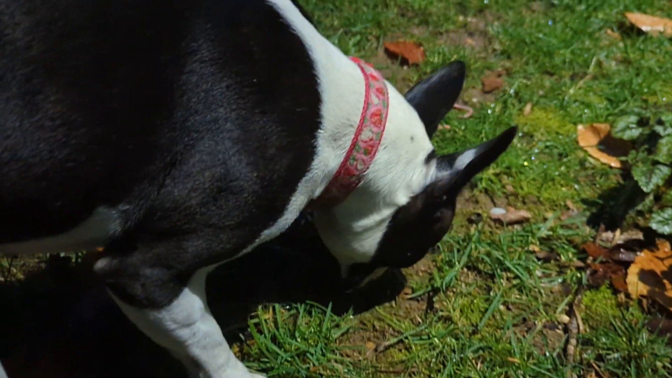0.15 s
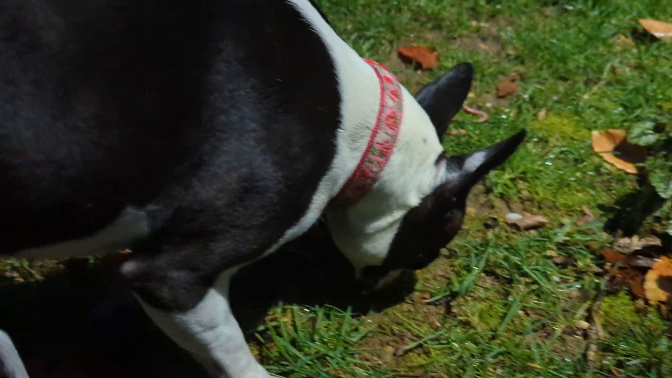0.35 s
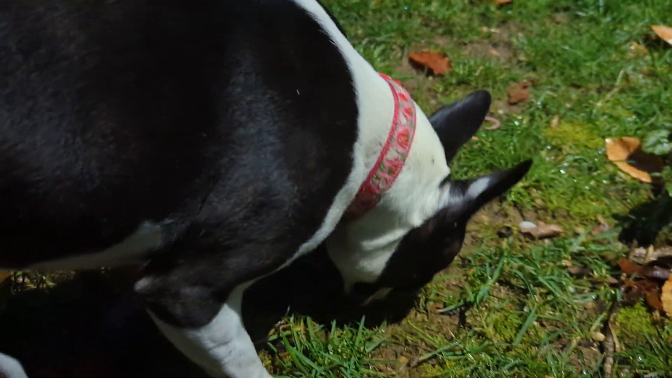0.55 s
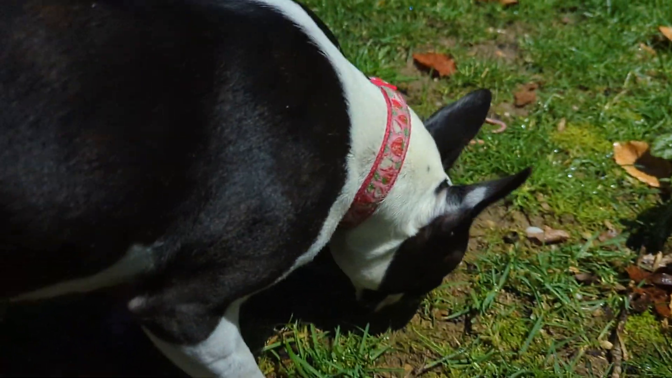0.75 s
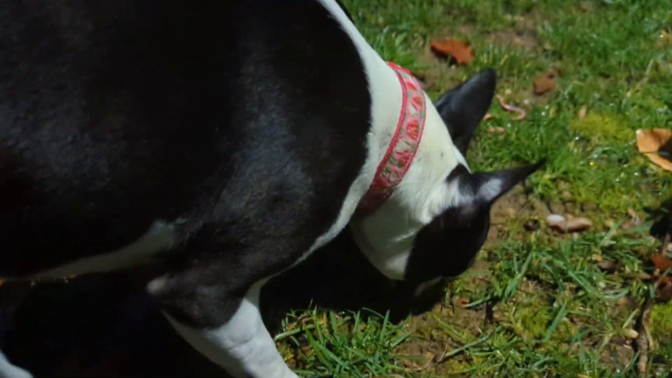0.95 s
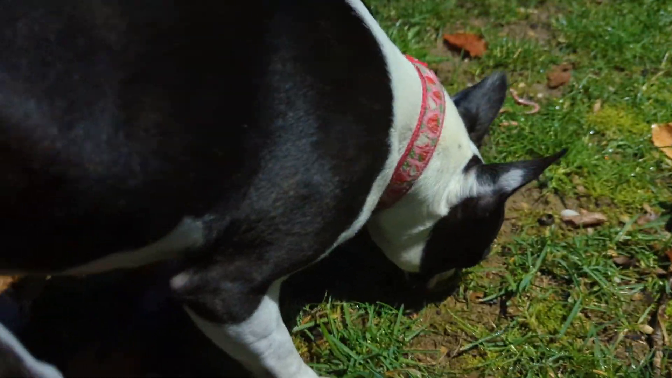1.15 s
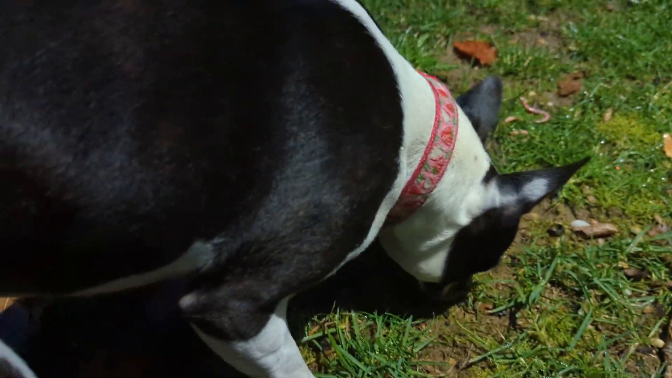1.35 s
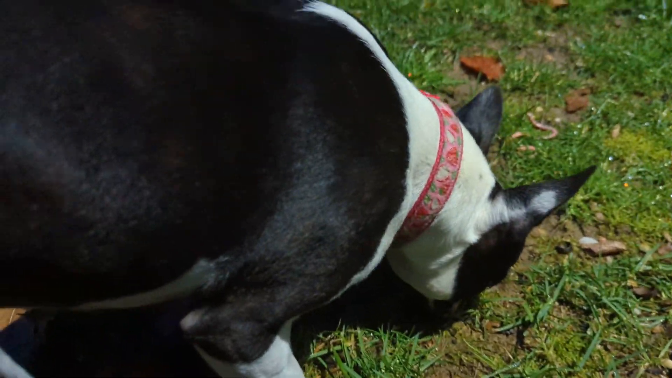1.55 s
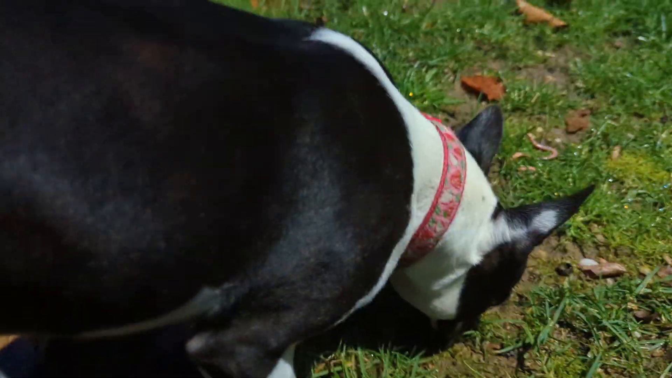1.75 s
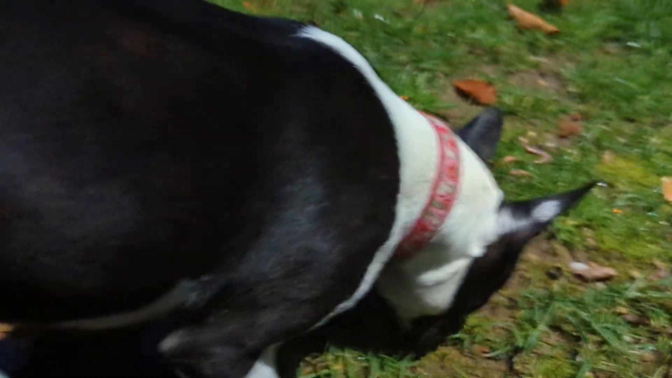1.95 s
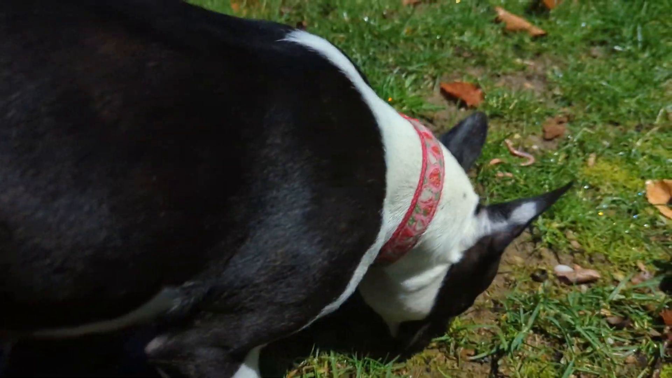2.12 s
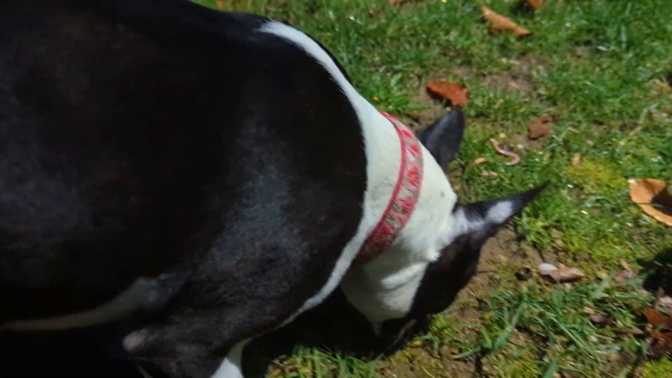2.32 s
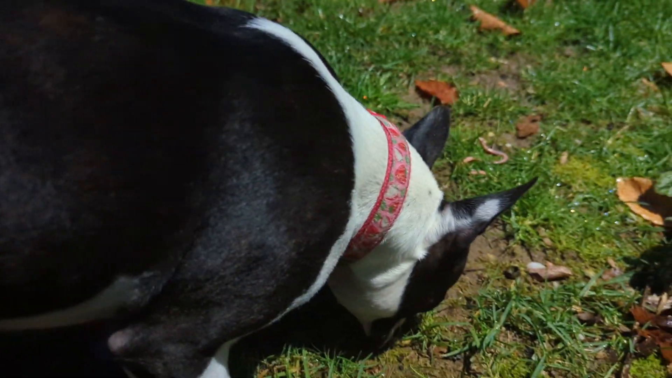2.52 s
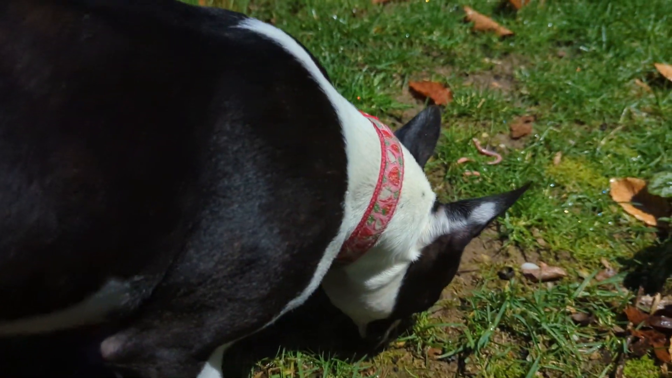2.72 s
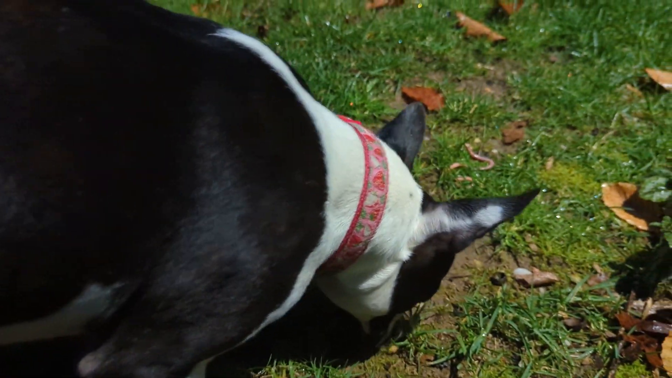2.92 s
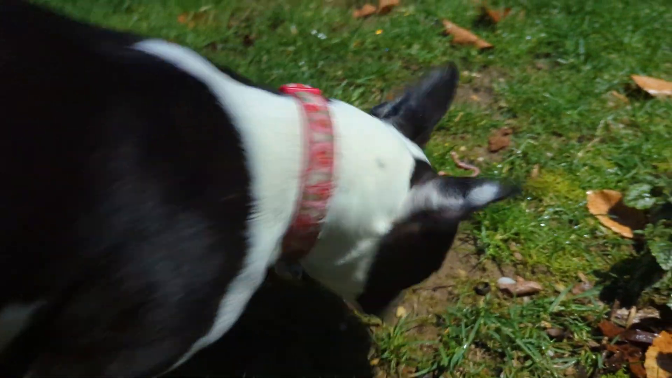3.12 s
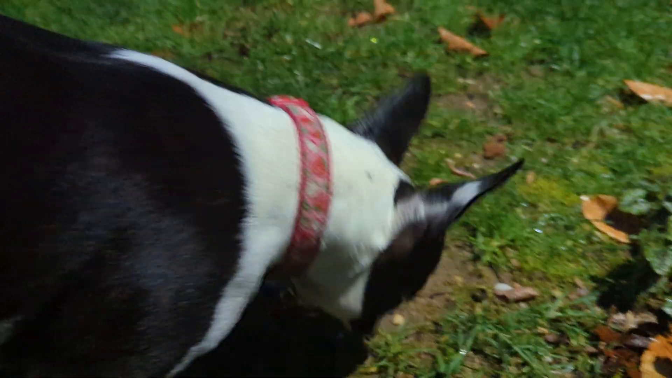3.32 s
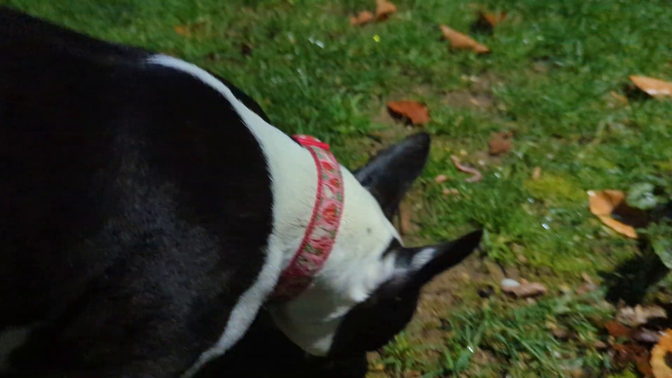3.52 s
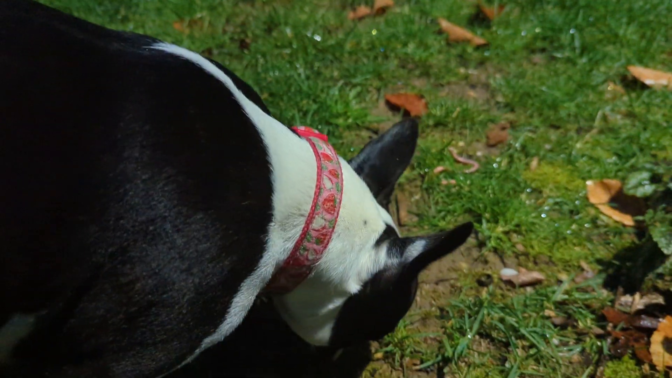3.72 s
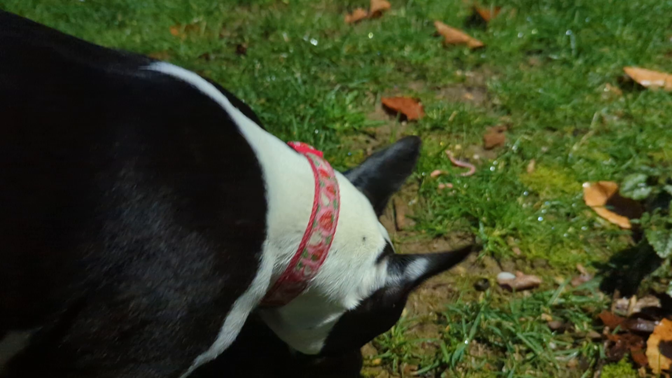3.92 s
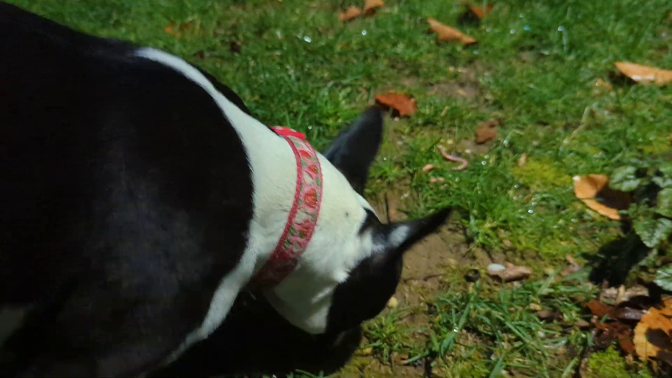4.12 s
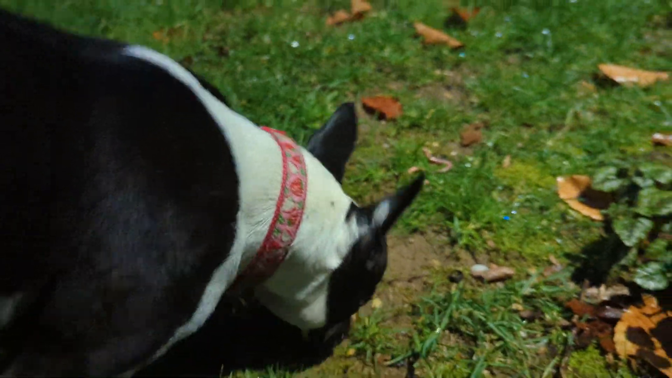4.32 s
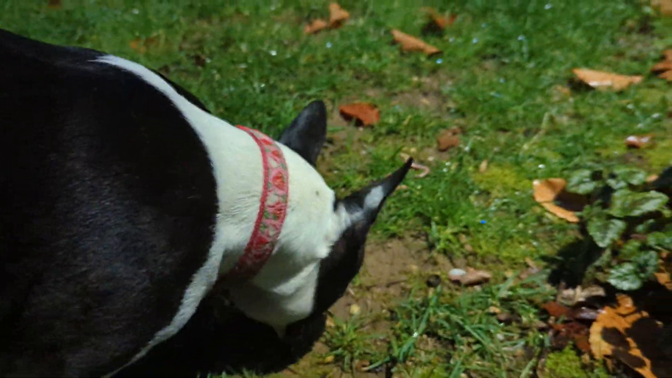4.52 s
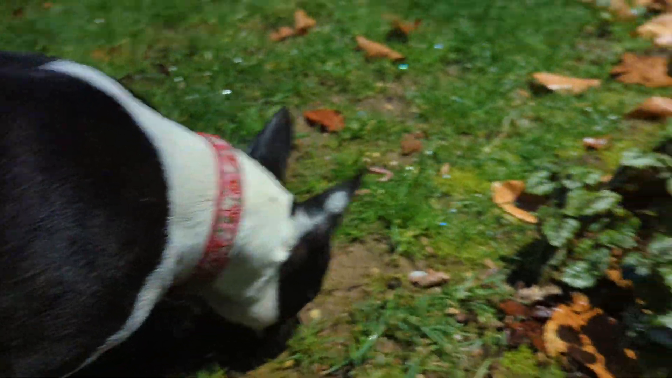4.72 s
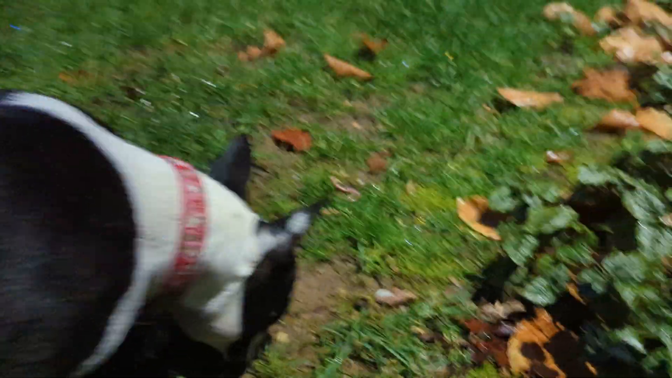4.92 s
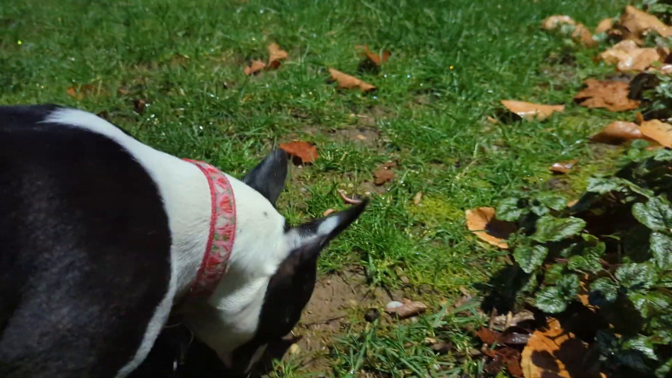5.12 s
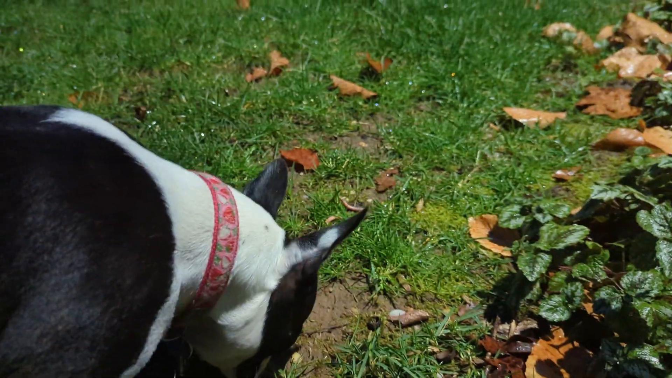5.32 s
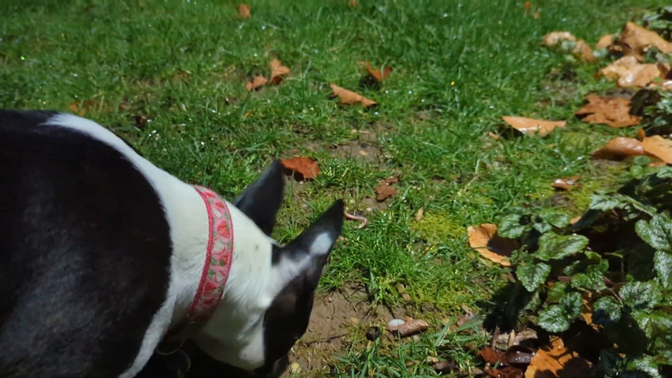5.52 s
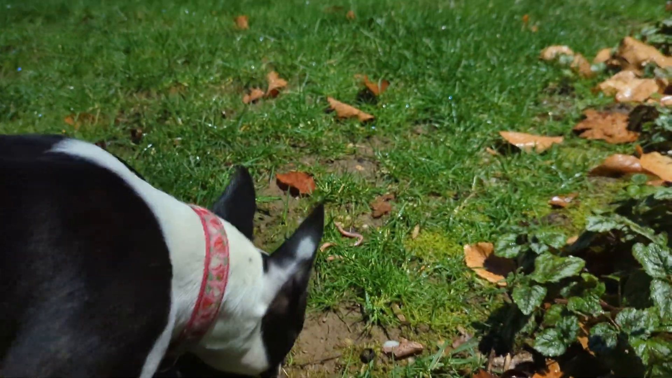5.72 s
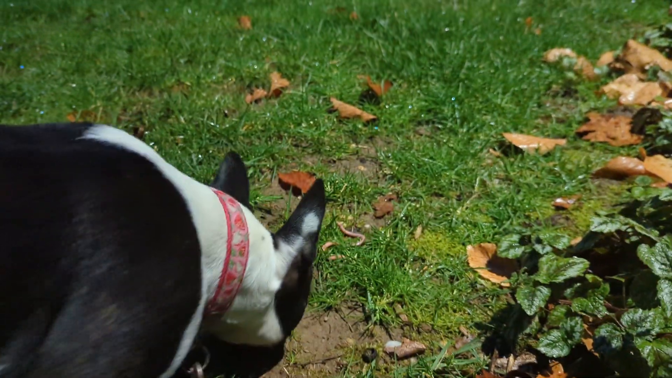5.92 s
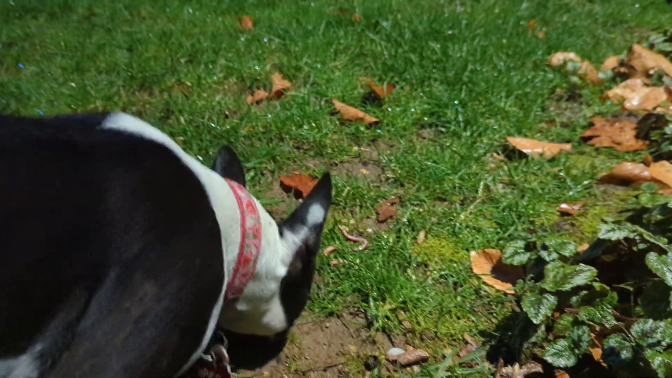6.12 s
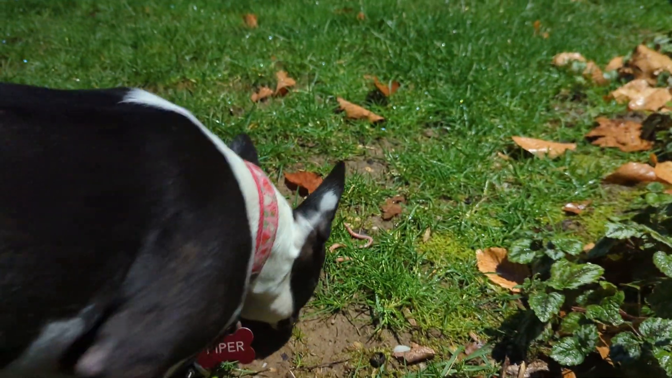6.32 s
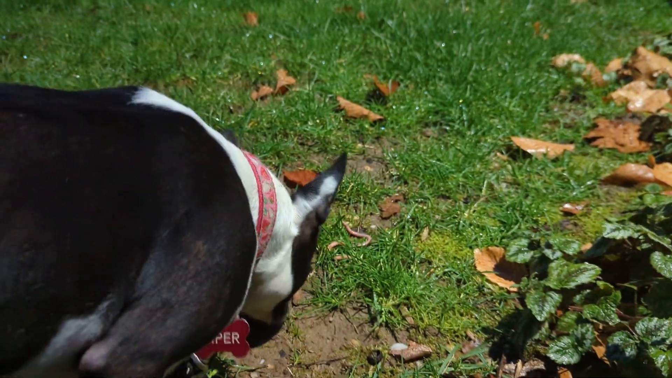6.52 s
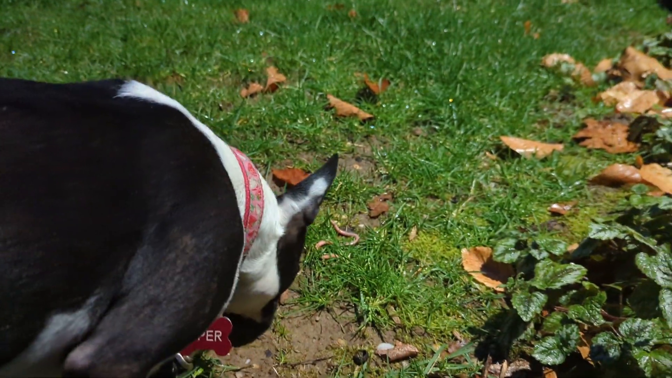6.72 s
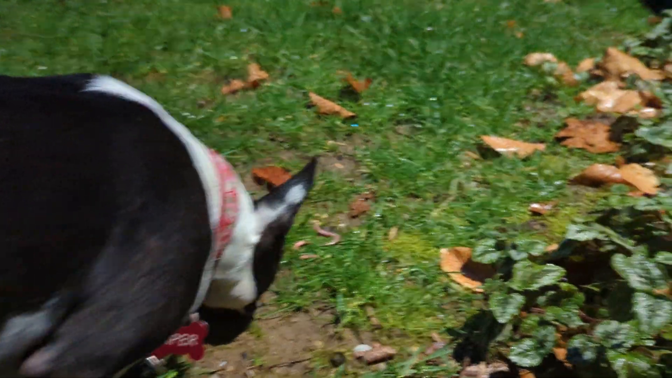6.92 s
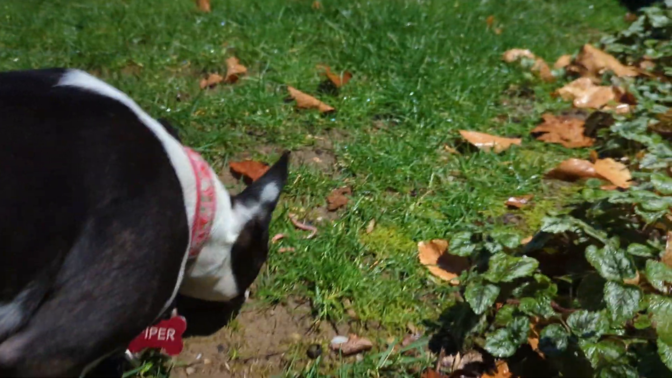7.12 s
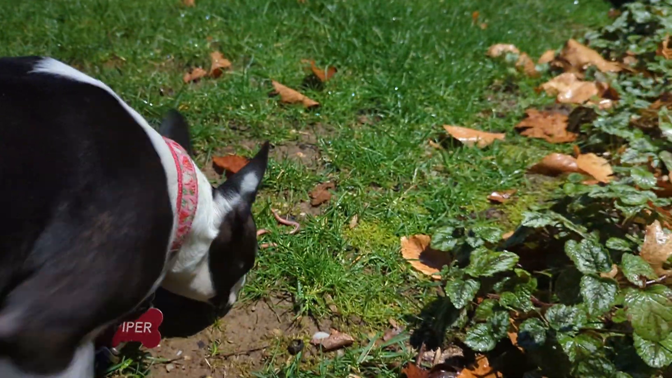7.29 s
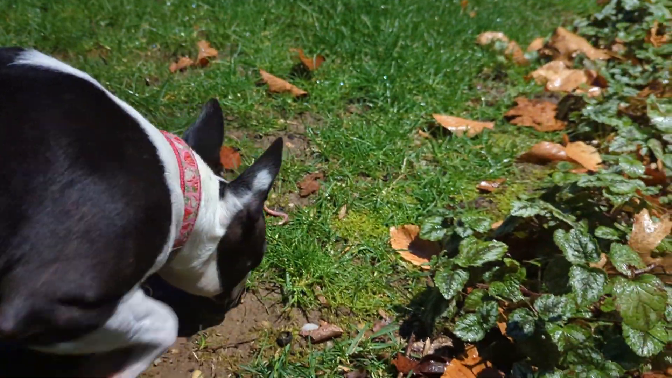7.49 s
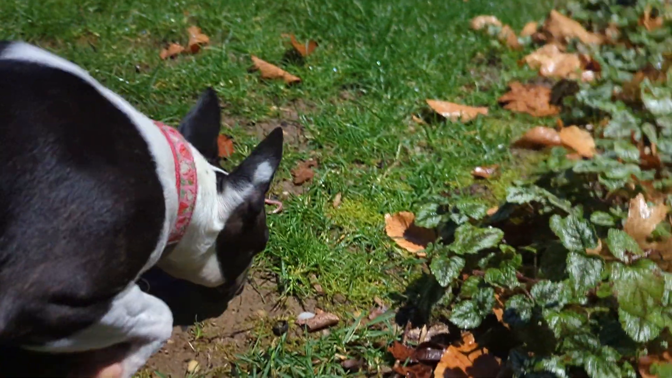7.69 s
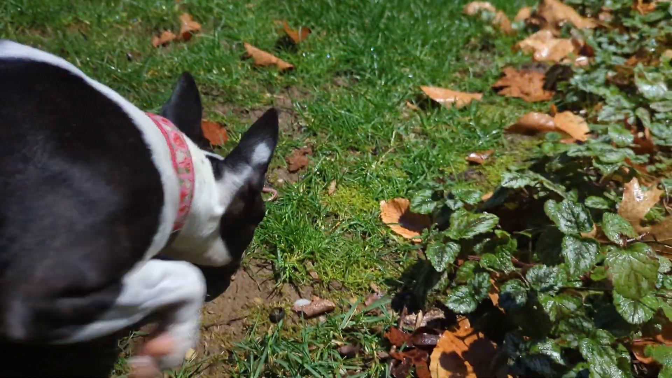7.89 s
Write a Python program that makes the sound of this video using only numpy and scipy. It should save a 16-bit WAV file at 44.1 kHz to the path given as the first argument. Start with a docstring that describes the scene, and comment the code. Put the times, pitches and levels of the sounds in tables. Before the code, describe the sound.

A dog sniffs through grass as its metal collar tags clink, with one bright jingle, over faint distant traffic.

```python
"""A lawn, with a dog nosing through the grass close by. Far traffic rumbles and hisses, low hums
swell and fade, and an engine builds as it pulls away. Grass rustles and snaps under muzzle and paws.
The dog sniffs and snorts: turbulent air through the resonances of nose, nostrils and chest.
The metal tags on its collar scrape together and ring, loudest in one jingle after three seconds."""
import sys
import numpy as np
from scipy import signal
from scipy.fft import rfft, irfft, next_fast_len
from scipy.io import wavfile
from scipy.ndimage import uniform_filter1d

SR = 44100
rng = np.random.default_rng(int(sys.argv[2]) if len(sys.argv) > 2 else 0)


def digitize_waveform(pressure):
    """Quantize a signal to 16-bit integers and store it at the path in sys.argv[1].

    Rows of a 2-D input are taken as channels; values are limited to [-1, 1].
    """
    field = np.atleast_2d(pressure).T
    bounded = np.clip(field, -1, 1)
    quanta = np.round(bounded * 32767).astype(np.int16)
    wavfile.write(sys.argv[1], SR, quanta)


N = 350587


def gain_of(db):
    return 10 ** (np.asarray(db) / 20)


def unit_rms(x):
    return x / np.sqrt(np.mean(x ** 2) + 1e-20)


def curve_at(points, hz):
    """Read a breakpoint curve along a log frequency axis."""
    point_hz, value = np.transpose(points)
    return np.interp(np.log(hz + 1), np.log(point_hz + 1), value)


def add(mix, start_s, sound, pan_db=0):
    """Lay a sound into the stereo mix; positive pan is left."""
    part = mix[:, round(start_s * SR):][:, :sound.shape[-1]]
    part += sound[..., :part.shape[1]] * gain_of([[pan_db / 2], [-pan_db / 2]])


def resonances(x, bands):
    """Parallel band-passes, each given as centre_hz, width_hz, gain_db."""
    return sum(gain_of(db) * signal.lfilter(*signal.iirpeak(hz, hz / width, SR), x)
               for hz, width, db in bands)


def gliding_resonance(x, hz, width_hz):
    """A moving band-pass: shift the curve hz down to zero, smooth, and shift back."""
    carrier = np.exp(2j * np.pi * np.cumsum(hz) / SR)
    pole = np.exp(-np.pi * width_hz / SR)
    return (carrier * signal.lfilter([1 - pole], [1, -pole], x / carrier)).real


def waver(size, depth_db=2.5, smooth_s=0.201):
    """A gain that wanders slowly."""
    width = round(smooth_s * SR) + 1
    drift = uniform_filter1d(uniform_filter1d(rng.standard_normal(size), width), width)
    return gain_of(depth_db * unit_rms(drift))


def noise_bed(spectrum, fft_size, patchy_db, flicker_db):
    """Stereo noise with drifting spectral patches and a flicker shared by all frequencies."""
    # Centred lows, wide highs: freq_hz, left_right_correlation
    stereo_likeness = [(60, 0.986), (180, 0.88), (550, 0.32), (1650, -0.1), (4970, 0.037), (15000, 0.18)]
    hop = fft_size // 2
    frames, hz = N // hop + 5, np.fft.rfftfreq(fft_size, 1 / SR)
    a, b, c, d, patches = rng.standard_normal((frames, len(hz), 5), dtype=np.float32).T
    patches = unit_rms(uniform_filter1d(uniform_filter1d(patches, size=12, axis=0), size=5, axis=1))
    flicker = unit_rms(uniform_filter1d(rng.standard_normal(frames), size=2))
    likeness = curve_at(stereo_likeness, hz)[:, None]
    left = a + 1j * b
    right = likeness * left + np.sqrt(1 - likeness ** 2) * (c + 1j * d)
    colour = gain_of(curve_at(spectrum, hz)[:, None] + patchy_db * patches + flicker_db * flicker)
    _, bed = signal.istft(np.array([left, right]) * colour, window="cosine", nperseg=fft_size, noverlap=hop)
    return unit_rms(bed[:, :N])


def ambience():
    """Far traffic rumble, road hiss and the fine rustle of grass and collar."""
    # Fader moves of the three beds: time_s, rumble_db, hiss_db, rustle_db
    faders = [(0.0, -56.5, -63.5, -73), (0.68, -56.5, -62, -73.5), (1.24, -58, -66.5, -79),
              (1.77, -58.5, -62.5, -77.5), (1.95, -57, -60.5, -64), (2.19, -58.5, -61.5, -74),
              (2.61, -56, -64.5, -77.5), (2.97, -55, -63, -78.5), (3.25, -54, -60, -55.5),
              (3.67, -56, -61.5, -73.5), (4.25, -52.5, -60.5, -71.5), (5.56, -53, -62, -72.5),
              (6.26, -51.5, -61, -71), (6.58, -53.5, -60.5, -66), (7.0, -50.5, -61, -74),
              (7.95, -50, -58.5, -76)]
    # Tone colour of each bed: freq_hz, density_db
    rumble_spectrum = [(25, -37.5), (40, -30.5), (55, -1.5), (70, -4.5), (113, 0), (148, -5.5), (200, -13),
                       (260, -18.5), (350, -21.5), (500, -49.5)]
    hiss_spectrum = [(150, -24), (250, -9), (400, -4), (600, -8), (800, -5), (1300, -5.5), (2200, -5.5),
                     (3200, -12.5), (5000, -21.5), (9000, -35), (16000, -46)]
    rustle_spectrum = [(2500, -23.5), (4500, -6), (5300, -9), (6100, -3), (6500, -4), (7000, -3.5),
                       (8000, -12.5), (10500, -7.5), (11800, -3.5), (13200, -13), (15000, -12.5),
                       (16000, -16.5)]
    beds = [noise_bed(rumble_spectrum, fft_size=4096, patchy_db=2.5, flicker_db=-0.48),
            noise_bed(hiss_spectrum, fft_size=1024, patchy_db=1.5, flicker_db=0.99),
            noise_bed(rustle_spectrum, fft_size=512, patchy_db=2.0, flicker_db=2.5)]
    time_s, *levels_db = np.transpose(faders)
    t = np.arange(N) / SR
    return sum(bed * gain_of(np.interp(t, time_s, db)) for bed, db in zip(beds, levels_db))


def engine(fade_in_s=0.183):
    """An engine pulling away: four harmonics of its firing rate, each wavering in level."""
    # Revs and loudness: time_s, firing_hz, level_db
    revs = [(5.6, 30.8, -51), (6.02, 30.75, -58.5), (6.4, 33.2, -57), (7.03, 34.25, -56.5),
            (7.95, 34.12, -51)]
    # Harmonics 2, 3, 4 and 6: gain_db
    harmonics_db = [-0.5, -5.5, 2, -13]
    time_s, firing_hz, level_db = np.transpose(revs)
    t = np.arange(time_s[0], time_s[-1], 1 / SR)
    cycles = np.cumsum(np.interp(t, time_s, firing_hz)) / SR
    tone = sum(gain_of(db) * waver(len(t)) * np.sin(2 * np.pi * (k * cycles + rng.random()))
               for k, db in zip((2, 3, 4, 6), harmonics_db))
    envelope = gain_of(np.interp(t, time_s, level_db)) * np.minimum((t - t[0]) / fade_in_s, 1)
    out = np.zeros((2, N))
    add(out, t[0], np.sqrt(2) * tone * envelope)
    return out


def hums(fade_s=0.1218):
    """Low sine tones in the centre that swell, glide a little and fade."""
    # One hum a row: start_s, length_s, from_hz, to_hz, level_db
    swells = [(0, 2.79, 59, 58.24, -63.5), (.15, 0.833, 81, 84.6, -62), (1, 0.296, 120, 119.7, -63),
              (1.55, 0.598, 93, 95.2, -58.5), (2.05, 0.511, 135, 147.2, -57), (3, 0.76, 122, 117.1, -60.5),
              (3.75, 0.442, 121, 108, -53.5), (4.1, 0.478, 101.1, 100, -48), (4.68, 0.71, 102.1, 107, -53),
              (4.5, 1.28, 116, 128, -58.5), (4.4, 1.178, 142, 138, -60.5), (5.35, .9, 181, 188.3, -61.5),
              (5.85, 1.24, 121, 127, -56.5)]
    out = np.zeros((2, N))
    for start_s, length_s, from_hz, to_hz, level_db in swells:
        hz = np.linspace(from_hz, to_hz, round(length_s * SR))
        tone = np.sqrt(2) * np.sin(2 * np.pi * (np.cumsum(hz) / SR + rng.random()))
        envelope = signal.windows.tukey(len(hz), min(2 * fade_s / length_s, 1))
        add(out, start_s, gain_of(level_db) * tone * envelope)
    return out


def grass_pats(attack_s=0.000323):
    """Paws and muzzle pat and snap the grass: each a quickly dying pitch and a puff of noise."""
    # One touch a row: start_s, level_db, pitch_hz, fall_octaves_per_s, t60_s, pitched_share, pan_db
    touches = [(.351, -30.5, 258, -0.5, 0.0284, 0.52, 0.5), (.355, -46.5, 1045, 50, 0.128, 0.85, 2),
               (.65, -44.5, 1194, 2, 0.019, 0.3, 0.1), (.724, -40.5, 3936, -3, .021, .6, -0.5),
               (.875, -40.5, 1464, -1, 0.044, 0.5, -1.5), (.9, -36, 1226, 4, 0.0236, 0.28, 1),
               (3.56, -35.5, 2089, 0.5, 0.0444, .77, -2.5), (3.883, -43.5, 2610, -1.5, 0.043, 0.72, 1.5),
               (4.115, -43.5, 2743, 2, 0.0224, 0.74, 3), (4.682, -41.5, 1503, 1.5, 0.037, 0.4, 1),
               (4.719, -46, 1392, -4.5, 0.079, 0.42, 1), (4.768, -38.5, 390, 0.5, .045, .64, 5),
               (5.153, -41.5, 416, -1.5, 0.0413, 0.22, 3), (6.632, -49.5, 1426, 3, 0.0622, 0.27, -2)]
    t = np.arange(SR // 8) / SR
    out = np.zeros((2, N))
    for start_s, level_db, pitch_hz, fall, t60_s, pitched, pan_db in touches:
        bands = [(pitch_hz, 800, 0), (700, 700, -5), (6000, 8000, -22)]
        puff = unit_rms(resonances(rng.standard_normal(len(t)), bands))
        tone = np.sin(2 * np.pi * np.cumsum(pitch_hz / 2 ** (fall * t)) / SR)
        envelope = gain_of(level_db - 60 * t / t60_s) * np.minimum(t / attack_s, 1)
        add(out, start_s, (pitched * tone + 0.7 * (1 - pitched) * puff) * envelope, pan_db)
    return out


def breath(rise_s, hold_s, fall_s, air_db, sag_db, upper_nose_db, hiss_db, chest_db, rasp_db):
    """One sniff or snort: fluttering turbulent air through nose, nostrils and chest, with a gliding rasp."""
    # Resonances of the airways: centre_hz, width_hz, gain_db
    nose_bands = [(1273, 570, 2), (2253, 1100, -0.5)]
    nostril_bands = [(6300, 2600, 0), (9000, 1700, 1), (11730, 2900, 2), (14900, 2500, -16)]
    chest_bands = [(562.4, 680, 0)]
    ends_db, tail_db, tail_s = -19, -14, 3.2 * fall_s  # weak flow at both ends, then a slower tail
    corners_s = np.cumsum([0, rise_s, hold_s, fall_s, tail_s])
    contour_db = np.array([ends_db, 0, 0, ends_db, ends_db + tail_db])
    t = np.arange(0, corners_s[-1], 1 / SR)

    def flow_db(lag=0, steepness=1):
        """Airflow envelope; lag lengthens the rise by a share of the hold."""
        times_s = corners_s + [0, lag * hold_s, 0, 0, 0]
        return np.interp(t, times_s, steepness * contour_db + [0, 0, sag_db, sag_db, sag_db])

    air = rng.standard_normal((5, len(t)))
    nose = resonances(air[0], np.add(nose_bands, [[0, 0, 0], [0, 0, upper_nose_db]]))
    hiss = resonances(air[1], nostril_bands)
    chest = resonances(resonances(air[2], chest_bands), chest_bands)
    rasp_flow_db = flow_db(lag=0.45)
    rasp_hz = 4540 - 300 * rasp_flow_db / ends_db  # sinks as the flow weakens
    rasp = gliding_resonance(air[3], rasp_hz, width_hz=850)
    blend = gain_of(flow_db()) * unit_rms(nose)
    blend += gain_of(hiss_db + flow_db(lag=0.12, steepness=1.42)) * unit_rms(hiss)
    blend += gain_of(chest_db + flow_db(steepness=0.708)) * unit_rms(chest)
    blend += gain_of(rasp_db + rasp_flow_db) * unit_rms(rasp)
    flutter = gain_of(2.3 * unit_rms(uniform_filter1d(air[4], size=90)))
    fades = np.clip(np.minimum(t / rise_s, (t[-1] - t) / 0.01), 0, 1)
    return gain_of(air_db) * flutter * blend * fades


def sniffing():
    """The dog's short pulls and bursts of air as it searches the lawn."""
    # One breath a row: start_s, rise_s, hold_s, fall_s, air_db, sag_db (change over the hold),
    # then, relative to the airflow: upper_nose_db, hiss_db, chest_db, rasp_db
    breaths = [(1.37, 0.0685, 0.0335, 0.0815, -53, 2.5, -10.5, -14, -15.5, -7),
               (1.71, .003, .004, .04, -39.5, -3, 8, 0.5, -33, -12.5),
               (1.83, 0.0409, 0.1221, 0.0173, -53, 2.5, -3, -7, -29.5, -2.5),
               (2.041, .003, .016, .038, -38.5, -4, 0.5, 5, -5.5, -8.5),
               (2.85, 0.024, 0.0187, 0.031, -46.5, -1.5, -3.5, -3, -25.5, -11),
               (3.04, 0.03765, .17, .03, -36, -13, -8.5, 6.5, -9, 0),
               (3.885, 0.0069, 0.0544, 0.0256, -65, 3.5, 0.5, 1, -20, -10),
               (7.27, 0.02102, 0.082, 0.11, -65.5, 0.5, 0.5, -1, -11.5, -9.5),
               (7.435, 0.0277, 0.00824, 0.0617, -53.5, -4, -10.5, 0, -11, -10.5)]
    out = np.zeros((2, N))
    for start_s, *shape in breaths:
        add(out, start_s, breath(*shape))
    return out


def clink(tick_db, parts_db, ring_scale, rattle_db=1.8):
    """Tags scrape, then ring; each mode beams its own way, so the channels differ."""
    # Modes of the metal: pitch_hz
    mode_hz = [2200, 4300, 5632, 6507, 7612, 8385, 11770, 12045, 14145, 14500, 15710]
    # What drives each mode: index into parts_db (1 small tag, 2 large tag, 3 collar ring, 4 split ring)
    mode_part = [1, 1, 1, 2, 1, 1, 3, 4, 2, 4, 3]
    # Ring and spread of each mode: gain_db, t60_s, left_lead_rad, pan_db
    modes = [(1.5, 0.035, 1.61, 0), (11, .03, 1.86, -3), (8.5, .056, -2, -8.5), (9, .1, -2, 2),
             (-9, .05, -2.5, 3.02), (-5, .05, -1.5, -1.53), (11, .048, -1.5, 1), (4.5, .038, -0.66, 1.5),
             (2, .065, -1, 4), (2.5, .035, 0.82, -1), (3, .028, 2, 1)]
    t = np.arange(SR // 10) / SR
    rise = np.sin(np.pi / 2 * np.minimum(t / 0.0021, 1)) ** 2  # the faces slide together before they part
    decay = gain_of(-60 * t / 0.013) + gain_of(-6.5 - 60 * t / 0.036)
    tick, clank = rng.standard_normal((2, 2, len(t))) * decay * rise
    out = gain_of(tick_db) * resonances(tick, [(7200, 5700, -2.5), (12803, 9140, 6.0)])
    out += gain_of(parts_db[0]) * resonances(clank, [(2790, 2200, 10.5)])
    rattle = unit_rms(uniform_filter1d(rng.standard_normal(len(t)), size=130))  # the tags keep brushing
    contact = rise * gain_of(-rattle_db * rattle * np.minimum(t / 0.012, 1))
    side = np.array([[0.5], [-0.5]])
    for hz, part, (db, t60_s, lead_rad, pan_db) in zip(mode_hz, mode_part, modes):
        detune, start_cycles, swing = rng.random(3)
        phase = 2 * np.pi * (hz * (1 + 0.0028 * (detune - 0.5)) * t + start_cycles)
        spread_rad = side * (lead_rad + 0.95 * (swing - 0.5))
        level_db = parts_db[part] + db + side * pan_db - 60 * t / (t60_s * ring_scale)
        out += gain_of(level_db) * np.cos(phase + spread_rad) * contact
    return out


def tag_tinkle(per_s=6):
    """Faint, damped touches of the tags at random moments."""
    out = np.zeros((2, N))
    for when, force, *softness in rng.random((round(per_s * N / SR), 7)):
        tick_db = -73 + 8 * force
        parts_db = tick_db - 4 - 14 * np.array(softness)
        add(out, when * N / SR, clink(tick_db, parts_db, ring_scale=0.34))
    return out


def tag_strikes():
    """The collar tags knock together, from light clinks to a bright jingle."""
    # One strike a row: start_s, tick_db, clank_db, small_tag_db, large_tag_db, collar_ring_db,
    # split_ring_db, ring_scale (factor on the ring time)
    strikes = [(0.0877, -55.5, -66.5, -76.5, -65.5, -73.5, -67, 0.71),
               (0.2708, -58, -54, -77, -72.5, -77.5, -74, 0.93),
               (0.636, -65.5, -67.5, -77.5, -83, -76.5, -75.5, 0.72),
               (0.7109, -61, -48, -72.5, -72.5, -69.5, -68.5, 0.54),
               (0.7226, -53.5, -42.5, -53, -53.5, -44.5, -51, 0.39),
               (1.6905, -51.5, -55.5, -58, -54, -60.5, -58.5, 0.27),
               (2.4773, -60.5, -67, -80.5, -86.5, -77.5, -78, 0.7),
               (2.6659, -63.5, -62.5, -78, -84, -76.5, -72.5, 0.73),
               (2.7135, -62.5, -54.5, -77.5, -72.5, -79.5, -77, 0.64),
               (2.9459, -52.5, -54.5, -71, -73, -72.5, -73.5, 0.7),
               (2.9981, -56, -66, -79.5, -72.5, -74.5, -74.5, 0.7),
               (3.1952, -35.5, -41.5, -44, -53, -54, -44.5, 0.84),
               (3.247, -23.5, -43.5, -33.5, -37.5, -27, -30, 0.87),
               (3.2525, -19, -50.5, -35, -20, -28, -21, 1), (3.2804, -37, -37, -48.5, -29.5, -50.5, -45, 1),
               (3.3034, -35.5, -37.5, -46.5, -50.5, -44, -45, 1),
               (3.3182, -27.5, -33.5, -43, -36, -36.5, -35, 0.664),
               (3.3994, -62, -52.5, -80, -75.5, -60, -62, 0.7),
               (3.464, -45.5, -44.5, -75, -72.5, -52.5, -55, 0.7),
               (3.5588, -57.5, -40.5, -50.5, -57, -61, -60.5, 1),
               (3.6491, -61, -61, -78.5, -77, -73, -69, 0.7),
               (3.703, -64.5, -58.5, -78, -81, -80, -79.5, 0.7),
               (3.8816, -54.5, -47.5, -61, -63, -54.5, -61.5, 0.68),
               (3.9059, -54.5, -61, -79, -76, -64.5, -62, 0.65),
               (4.0962, -57, -48, -69.5, -61.5, -60, -57.5, 0.3),
               (4.114, -41, -45, -72, -65, -51, -51, 0.46),
               (4.1437, -54.5, -49, -74, -68, -63.5, -66.5, 0.74),
               (4.2744, -61.5, -59, -72, -77, -82, -77.5, 0.7),
               (4.5238, -45.5, -46, -75, -53.5, -48, -50.5, 0.466),
               (4.5319, -46, -46, -74.5, -60, -35, -42, 0.43),
               (4.7195, -44, -43, -62.5, -54, -53.5, -50, 0.81),
               (4.8229, -61.5, -68.5, -77, -80, -74, -78.5, 0.68),
               (5.046, -67.5, -73, -82, -69.5, -74.5, -71, 0.7),
               (5.301, -57, -57, -66, -56, -51, -57, 0.555),
               (5.434, -61, -63.5, -79, -75.5, -78.5, -75.5, 0.7),
               (5.6482, -60, -62, -77.5, -67.5, -70, -74.5, 0.6),
               (5.689, -58, -65.5, -77.5, -78.5, -67, -69, 0.66),
               (5.763, -67, -55, -68, -81, -80, -80, 0.7),
               (6.2207, -56, -66, -74.5, -78.5, -58.5, -60.5, 0.698),
               (6.3125, -54.5, -66.5, -79, -80.5, -67, -66, 0.69),
               (6.4128, -48.5, -68, -69.5, -62, -53, -57.5, 0.645),
               (6.4544, -47, -62, -71.5, -57.5, -54, -52, 0.63),
               (6.7229, -58, -68, -77.5, -73.5, -63.5, -65.5, 0.63),
               (6.7864, -59, -72.5, -82, -67.5, -70, -71, 0.64),
               (7.3277, -48, -55.5, -59.5, -61.5, -65.5, -63, 0.605),
               (7.4596, -62, -59, -68.5, -68, -64.5, -63, 0.76),
               (7.4796, -45, -52.5, -55.5, -53.5, -55.5, -58.5, 0.76),
               (7.5, -50, -55.5, -65.5, -63.5, -60, -58.5, 0.6),
               (7.5675, -51.5, -49.5, -54.5, -66, -59.5, -54.5, 0.79),
               (7.721, -72.5, -58.5, -59, -78.5, -60.5, -64, 0.7),
               (7.7732, -57, -50, -68, -67.5, -63.5, -68, 0.88),
               (7.8111, -56, -63.5, -71.5, -64.5, -58.5, -60, 0.625),
               (7.8413, -67.5, -63, -75.5, -79, -64.5, -63, 0.66)]
    out = np.zeros((2, N))
    for start_s, tick_db, *parts_db, ring_scale in strikes:
        add(out, start_s, clink(tick_db, parts_db, ring_scale))
    return out


def microphone_ports(x):
    """Two microphone ports hear the dog differently, shifting phase and balance across the spectrum."""
    # Phase between the ports: freq_hz, left_lead_rad
    phase_lead = [(0, -1), (950, 0.69), (1980, 0), (3190, 1.71), (4310, 1), (5770, 5), (6890, 1),
                  (8440, -10.5), (10200, 23), (11300, 16.5), (12600, 18), (14600, 16.5), (15300, 20),
                  (16500, 5)]
    # Balance between the ports: freq_hz, pan_db
    balance = [(60, 1.5), (110, 4.5), (200, -5), (380, -3.5), (700, -2.5), (1290, -12.5), (2380, 3.5),
               (4400, -3), (8120, 1.5), (15000, 1.5)]
    size = next_fast_len(N)
    hz = np.fft.rfftfreq(size, 1 / SR)
    lead_rad = np.interp(hz, *np.transpose(phase_lead))
    left = gain_of(curve_at(balance, hz) / 2) * np.exp(0.5j * lead_rad)
    return irfft(rfft(x, size) * np.array([left, 1 / left]), size)[:, :N]


def reflections(x):
    """Ground, hedge and walls send back a short diffuse tail, different on each side."""
    t = np.arange(SR // 4) / SR
    taps = rng.standard_normal((2, len(t))) * (rng.random((2, len(t))) < 0.06) * (t > 0.0015)
    tail = taps * (gain_of(-60 * t / 0.053) + gain_of(-33 - 60 * t / 0.13))
    tail /= np.linalg.norm(tail, axis=1, keepdims=True)
    return signal.fftconvolve(x, tail, axes=1)[:, :N]


def scene():
    """The dog up close with its reflections, over the ambience, engine and hums."""
    tinkle = tag_tinkle()
    nosing = sniffing() + grass_pats()
    tags = tinkle + tag_strikes()
    send = nosing + gain_of(-6) * tags  # the tags stir the tail less than the nose does
    dog = microphone_ports(nosing) + tags + gain_of(-4) * reflections(send)
    return dog + ambience() + engine() + hums()


def record(dry):
    """A steep low-pass trims the very top."""
    lowpass = signal.firwin(255, 15850, window=("kaiser", 7), fs=SR)
    return signal.oaconvolve(dry, lowpass[None], "same")


dry = scene()
out = record(dry)
digitize_waveform(out)
```